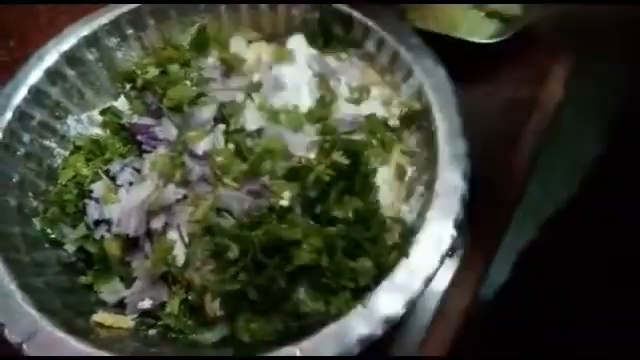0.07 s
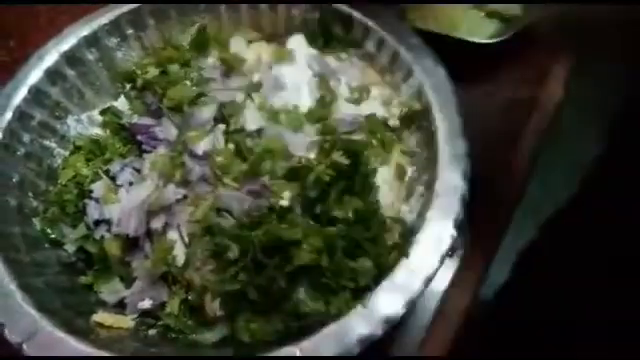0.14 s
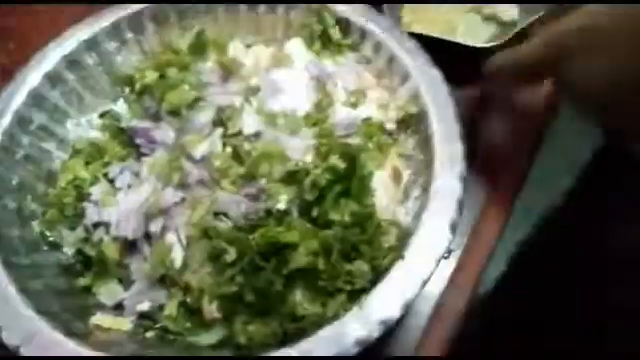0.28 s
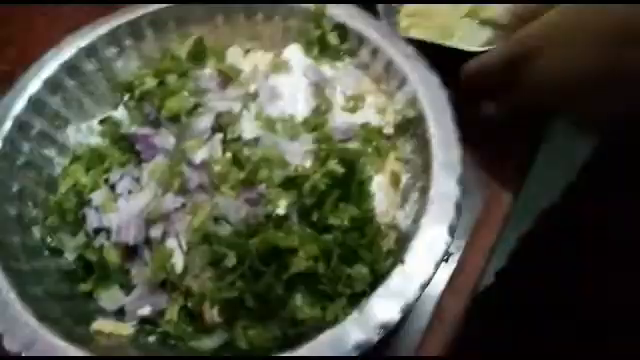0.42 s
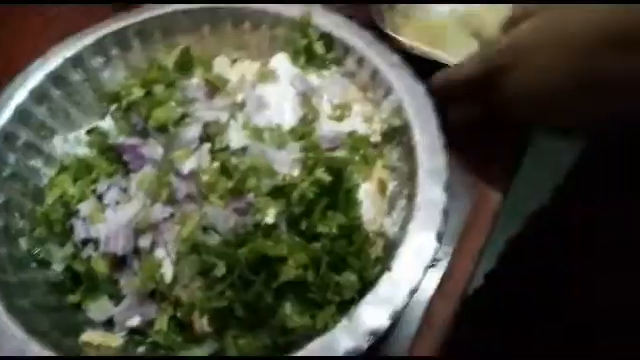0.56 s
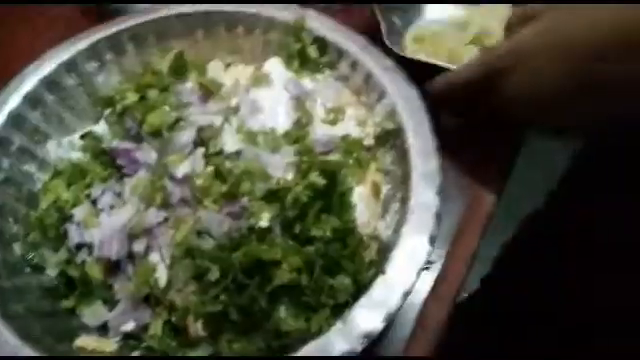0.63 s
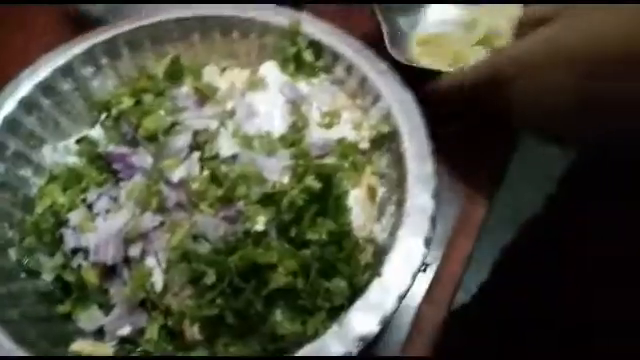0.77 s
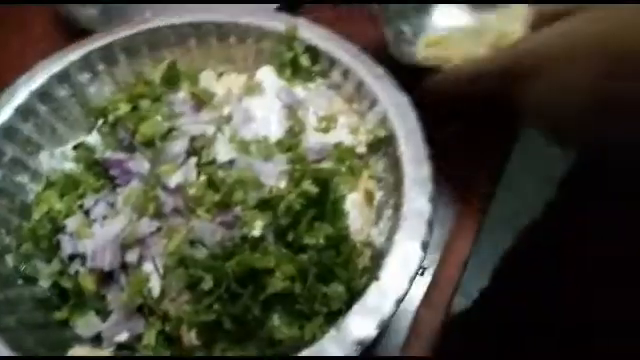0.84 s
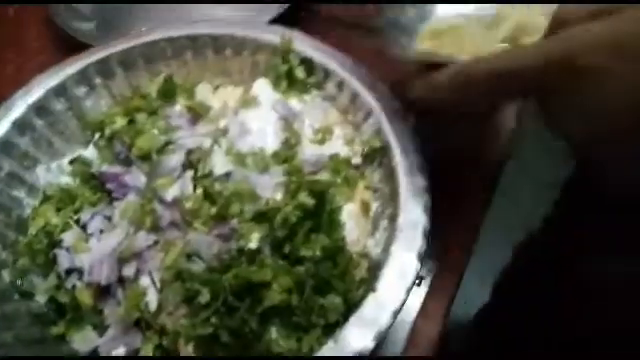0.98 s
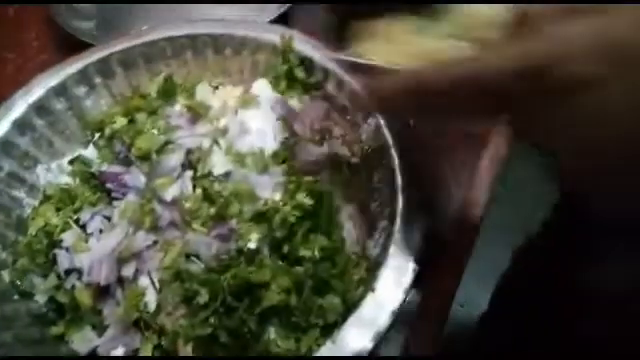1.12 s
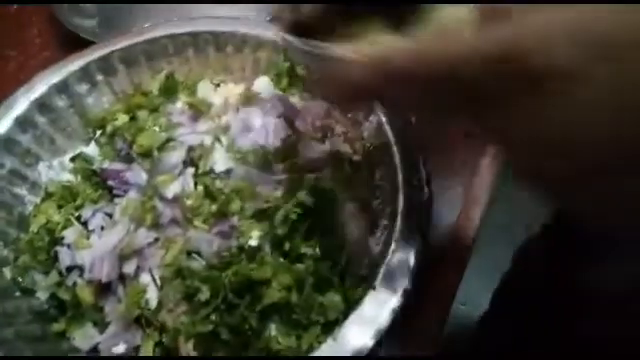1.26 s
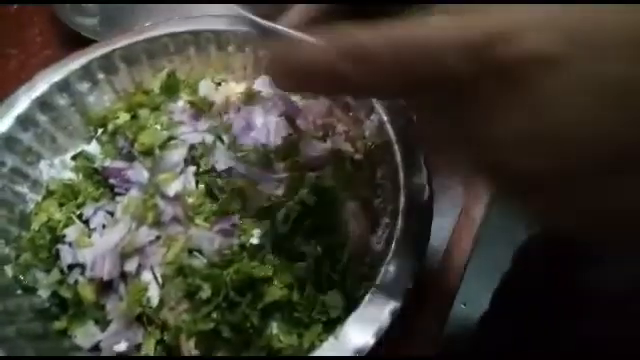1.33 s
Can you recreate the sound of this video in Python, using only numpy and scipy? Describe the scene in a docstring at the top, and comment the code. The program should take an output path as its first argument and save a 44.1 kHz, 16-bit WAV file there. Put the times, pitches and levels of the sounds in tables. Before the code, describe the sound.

A thin steel bowl strikes a steel vessel at about 0.25 s, just after a barely audible touch. A bright clattering crack opens into a clear, slightly beating ring around 700 Hz. From 0.47 to 0.65 s a faint gritty scrape, then a chattering, damped clank at 0.65 s stops the ring. A light tick comes at 1.13 s. Close microphone, hard kitchen reflections, faint low background.

```python
"""Steel bowl knocked and set down in a kitchen

Close microphone, hard-walled kitchen, faint low background. After a light touch a thin steel bowl knocks
against a steel vessel and rings: decaying partials, some in beating pairs, under bright noise cracks.
It scrapes briefly along the vessel, random catches exciting rim resonances, then lands with a short
damped clank of pressed-together modes and noise. A light tick of five partials follows.
"""
import sys
import numpy as np
from scipy import signal
from scipy.fft import rfft, irfft
from scipy.io import wavfile

SR = 44100
rng = np.random.default_rng(int(sys.argv[2]) if len(sys.argv) > 2 else 0)


def file_out(sig):
    """Save sig as 16-bit WAV at sys.argv[1]."""
    # one column per channel
    cols = np.atleast_2d(sig).T
    # limit, then scale
    lim = np.clip(cols, -1, 1)
    pcm = np.round(lim * 32767).astype(np.int16)
    wavfile.write(sys.argv[1], SR, pcm)


N = 61739  # length [samples]
TOP_HZ = 15900  # upper limit of the wall modes and of the recorder

# Contacts of the bowl landing on the vessel: (time [s], relative level [dB])
LANDING_CONTACTS = [(.6512, -0.5), (.6530, 2.5), (.6570, -1), (.6632, -4.5), (.6685, -6.5)]


def undb(db):
    """Decibels to gain."""
    return 10 ** (np.asarray(db) / 20)


def unit(x):
    """Scale to rms 1."""
    return x / np.sqrt(np.mean(x ** 2))


def since(start):
    """Seconds since a moment, zero before it."""
    return np.maximum(np.arange(N) / SR - start, 0)


def curve(points, hz):
    """Read a table on a log-frequency axis."""
    table_hz, values = np.array(points, float).T
    return np.interp(np.log(np.maximum(hz, 1)), np.log(table_hz), values)


def noise(colour, formants=1):
    """Noise with the given spectrum, rms 1."""
    hz = np.fft.rfftfreq(N, 1 / SR)
    white = rfft(rng.standard_normal(N))
    return unit(irfft(white * formants * undb(curve(colour, hz)), N))


def fade(t, t60, attack_s=.0002):
    """Quick rise with the contact's time constant, then exponential decay by 60 dB per t60."""
    rise = 1 - np.exp(-t / attack_s)
    return rise * np.exp(-np.log(1000) * t / t60)


def ring(start, modes):
    """Decaying partials of a struck body, alternating in sign."""
    t = since(start)
    tone = 0
    for k, (hz, db, t60) in enumerate(modes):
        partial = fade(t, t60) * np.sin(2 * np.pi * hz * t)
        tone = tone + (-1) ** k * undb(db) * partial
    return tone


def broadened(modes):
    """Gain per frequency of a body whose modes are widened by contact, with valleys between them."""
    width_hz, valley_db = 290, -9  # width at half gain; constant gain added under the peaks
    hz = np.fft.rfftfreq(N, 1 / SR)
    peaks = [1 / (1 + (2 * (hz - mode_hz) / width_hz) ** 2) for mode_hz, _, _ in modes]
    return np.max(peaks, axis=0) + undb(valley_db)


def crowd(colour, formants=1, count=200):
    """Many weak, irregularly spaced partials of a thin steel wall, rms 1."""
    lowest_hz, spread_db = 300, 6  # each level strays up to the spread either way
    place, size, turn = rng.random((count, 3)).T
    hz = lowest_hz + (TOP_HZ - lowest_hz) * (np.arange(count) + place) / count
    level_db = curve(colour, hz) + spread_db * (2 * size - 1)
    lines = np.zeros(N // 2 + 1, complex)
    lines[(hz * N / SR).astype(int)] = undb(level_db) * np.exp(2j * np.pi * turn)
    return unit(irfft(lines * formants, N))


def cracks(contacts, colour, t60, formants=1):
    """Each contact of the chattering rim gives a brief bright crash of noise."""
    return sum(undb(db) * fade(since(s), t60) * noise(colour, formants) for s, db in contacts)


def background():
    """Faint steady background of the kitchen, as coloured noise."""
    # Its spectrum: (frequency [Hz], density [dB per Hz])
    floor_colour = [(25, -16.5), (60, -7), (115, 3.5), (200, -9), (450, -10.5), (1600, -15.5),
                    (2300, -21.5), (4500, -20), (7500, -27.5), (9000, -23), (9600, -36), (15000, -35)]
    return undb(-67.5) * noise(floor_colour)  # rms level [dB]


def kitchen(x):
    """Diffuse reflections from hard walls, as decaying noise in bands; the treble dies first."""
    # Reverberation of the room: (band centre [Hz], t60 [s])
    room_t60 = [(150, .55), (500, 0.57), (1500, 0.82), (2400, 0.58), (5000, 0.47), (8000, 0.29),
                (14000, 0.19)]
    room_db, build_s = -11, .0098  # level of the reflections, time constant of their build-up
    white = rfft(rng.standard_normal(N))
    hz, t = np.fft.rfftfreq(N, 1 / SR), since(0)
    tail = 0
    for centre, t60 in room_t60:
        band = curve([(f, f == centre) for f, _ in room_t60], hz)  # overlapping triangle
        tail = tail + irfft(white * band, N) * fade(t, t60, build_s)
    tail = tail / np.sqrt(np.sum(tail ** 2))
    return undb(room_db) * signal.fftconvolve(x, tail)[:N]


def touch():
    """Light first touch before the knock: a few short partials."""
    # Modes of the touch: (frequency [Hz], level [dB], t60 [s])
    touch_modes = [(190, -47, .04), (520, -48, .015), (3800, -62, .02), (7100, -55, .05)]
    return ring(.2335, touch_modes)  # start [s]


def tick():
    """Light tick after the clank: a few short partials."""
    # Modes of the tick: (frequency [Hz], level [dB], t60 [s])
    tick_modes = [(1680, -62, .1), (3050, -55, .03), (3260, -56, .025), (4330, -52, .04), (4680, -55, .025)]
    return ring(1.1322, tick_modes)  # start [s]


def scrape():
    """Tiny uneven catches of the sliding rim excite the damped steel."""
    # Level of the slide: (time [s], level [dB])
    slide_level = [(.47, -65), (.495, -47), (.517, -45), (.529, -33), (.545, -44), (.563, -41), (.59, -43),
                   (.61, -42), (.63, -43), (.636, -33), (.645, -42), (.655, -60)]
    # Crowded upper modes of the wall under the rim: (frequency [Hz], density [dB per Hz])
    wall_colour = [(300, -10.5), (700, -4.5), (1500, -4.5), (2400, -5.5), (3000, -4), (4000, -5.5),
                   (5200, -7), (6300, -8), (8000, -25.5), (11000, -16.5), (15000, -34.5)]
    # Resonances of the rim while it slides: (frequency [Hz], relative level [dB], t60 [s])
    rim_modes = [(1450, -1, .06), (1590, -1, .1), (2060, -6, .12), (3000, -3, .07), (3850, -13, .1),
                 (4540, -5, .06), (5270, -4, .07), (6530, -14, .15), (7300, -20, .15), (7950, -23, .15),
                 (10330, -18, .1), (11100, -22, .1)]
    catches_per_s, catch_spread_db = 1500, 2.5
    wall_db, wall_t60_s = 2, .07  # wall level against the rim resonances

    catches = rng.random(N) < catches_per_s / SR
    catches = catches * undb(catch_spread_db * rng.standard_normal(N))
    wall = undb(wall_db) * crowd(wall_colour) * fade(since(0), wall_t60_s)
    steel = ring(0, rim_modes) + wall
    times, levels = np.array(slide_level).T
    level_db = np.interp(since(0), times, levels, left=-np.inf, right=-np.inf)
    return unit(signal.fftconvolve(catches, steel)[:N]) * undb(level_db)


def clank():
    """The bowl lands, chatters and is damped by the contact."""
    # Modes of the vessels pressed together, with the counter's thud:
    # (frequency [Hz], level [dB], t60 [s])
    pressed_modes = [(172, -41, .35), (528, -38, .55), (690, -29, .1), (1040, -28, .12), (1248, -26, .14),
                     (1330, -53, 1.0), (1376, -52, 1.0), (1570, -46, .7), (1622, -48, .95),
                     (1682, -49, 1.0), (1760, -49, .95), (2080, -33, .27), (2460, -41, .42),
                     (2620, -30, .11), (3639, -32, .16), (4510, -24, .1), (4810, -26, .12),
                     (5370, -28, .11), (6060, -34, .16)]
    # Colour of the crash: (frequency [Hz], density [dB per Hz])
    crash_colour = [(70, -30), (170, -4), (300, -9.5), (600, -1.5), (850, -3), (1200, -3.5), (1800, -10),
                    (2600, -4), (3500, -2.5), (4800, 0), (5800, -1.5), (8000, -10), (9200, -21.5),
                    (13000, -21.5), (15500, -27.5)]
    crash_db, crash_t60_s = -16, .07
    crash = cracks(LANDING_CONTACTS, crash_colour, crash_t60_s)
    return ring(LANDING_CONTACTS[1][0], pressed_modes) + undb(crash_db) * crash


def knock():
    """The bowl is hit and rings on, its paired modes beating, until it lands and is damped."""
    # Contacts of the ringing knock: (time [s], relative level [dB])
    contacts = [(.2478, -2), (.2500, -1), (.2533, -1), (.2582, -6.5)]
    # Modes of the freely ringing bowl: (frequency [Hz], level [dB], t60 [s])
    bowl_modes = [(366, -31, .95), (379, -26, .1), (548, -27, .42), (654, -19, .48), (698.5, -19, .6),
                  (703.5, -14.5, .52), (732, -26, .6), (1000, -26, .27), (1295, -25.5, .66),
                  (1665, -24, .42), (2065, -33, .6), (2101, -32, .6), (2468, -29, .42), (2875, -27, .34),
                  (3284, -32, .48), (3503, -24, .17), (3677, -33, .55), (4130, -38, .6), (4490, -33, .48),
                  (4753, -23, .19), (5065, -21, .25), (5308, -28, .43), (5586, -26, .43), (6530, -37, .6),
                  (6702, -31, .33), (7504, -33, .38), (7946, -36, .28), (8705, -34, .14), (10280, -45, .42),
                  (11300, -52, .36), (12900, -55, .33)]
    # Colour of the crack and the crowded upper modes: (frequency [Hz], density [dB per Hz])
    crack_colour = [(100, -36), (250, -16), (400, 0.5), (700, -6.5), (1000, 3.5), (1600, -1), (1900, -8),
                    (2700, 1), (3600, -3.5), (4100, -6.5), (4800, 0), (5500, -2), (6000, -1.5),
                    (7500, -6.5), (9000, -21.5), (13000, -23.5), (15500, -28)]
    # Dull thud of the knock through the counter: (frequency [Hz], density [dB per Hz])
    thud_colour = [(30, 1), (60, 5.5), (120, -5.5), (220, 0.5), (300, 4.5), (500, -20), (2000, -57)]
    crack_db, crack_t60_s = -14, .067
    shell_db, shell_t60_s = -24, .52  # crowded modes of the bowl wall
    thud_db, thud_t60_s = -43, .7
    twin_hz, twin_share, twins_above_hz = 18, .5, 1400  # mean split, gain, lower limit
    damped_t60_s = .069  # extra decay once the bowl has landed

    start = contacts[0][0]
    # An imperfectly round wall splits the upper modes into beating pairs
    splits = twin_hz * (.5 + rng.random(len(bowl_modes)))
    twins = [(hz + split, db, t60) for (hz, db, t60), split in zip(bowl_modes, splits)
             if hz > twins_above_hz]
    tone = ring(start, bowl_modes) + twin_share * ring(contacts[1][0], twins)

    # While the rim chatters the modes are broad
    formants = broadened(bowl_modes)
    shell = undb(shell_db) * fade(since(start), shell_t60_s) * crowd(crack_colour, formants, count=420)
    thud = undb(thud_db) * fade(since(start), thud_t60_s) * noise(thud_colour)
    damping = undb(-60 * since(LANDING_CONTACTS[0][0]) / damped_t60_s)
    crack = undb(crack_db) * cracks(contacts, crack_colour, crack_t60_s, formants)
    return (tone + shell + thud) * damping + crack


def scene():
    """Touch, knock, scrape, clank and tick in the kitchen; a low cut keeps the steel free of deep bass."""
    steel = touch() + knock() + scrape() + clank() + tick()
    low_cut = signal.butter(2, 110, "high", fs=SR, output="sos")  # corner [Hz]
    steel = signal.sosfilt(low_cut, steel)
    return (steel + kitchen(steel) + background())[None]


def record(dry):
    """The recorder cuts the top with a steep low-pass."""
    top_cut = signal.ellip(8, .2, 70, TOP_HZ, fs=SR, output="sos")
    return signal.sosfilt(top_cut, dry)


dry = scene()
out = record(dry)
file_out(out)
```